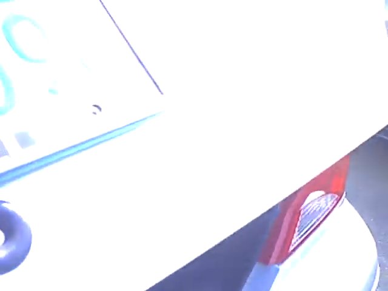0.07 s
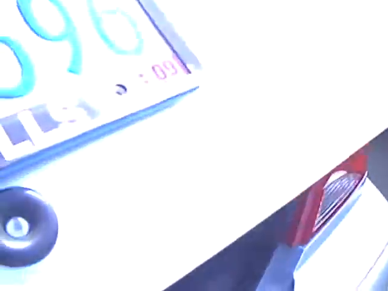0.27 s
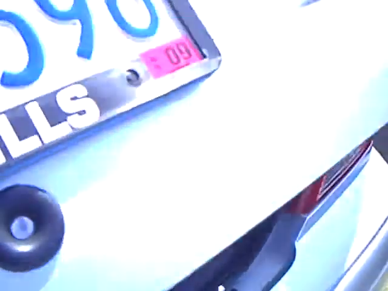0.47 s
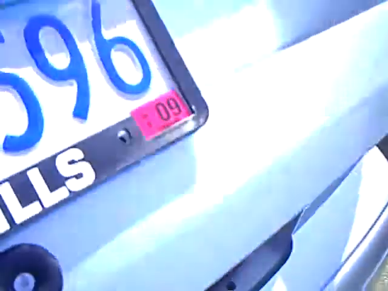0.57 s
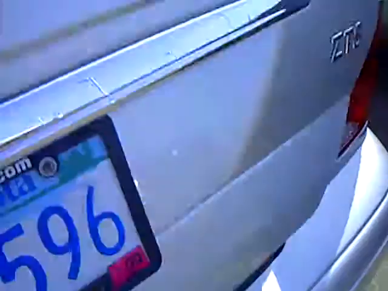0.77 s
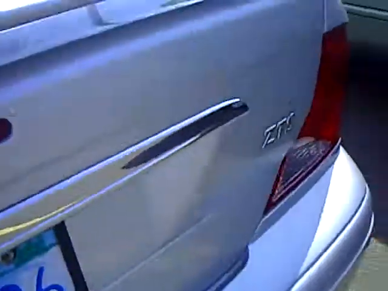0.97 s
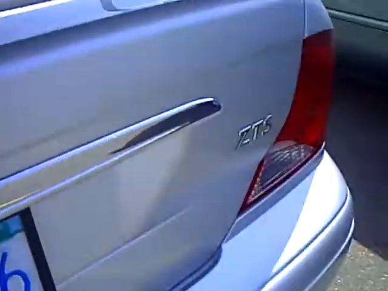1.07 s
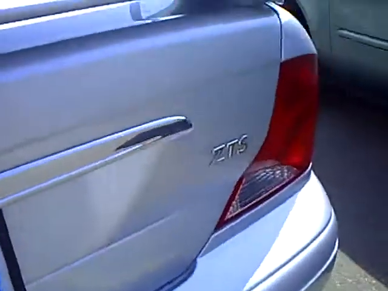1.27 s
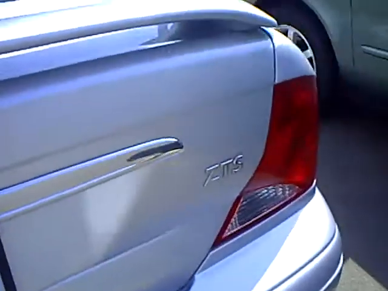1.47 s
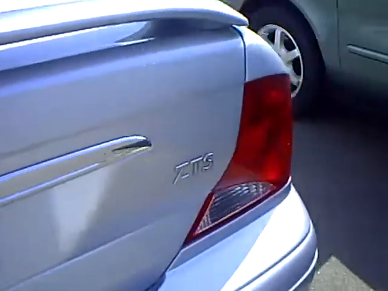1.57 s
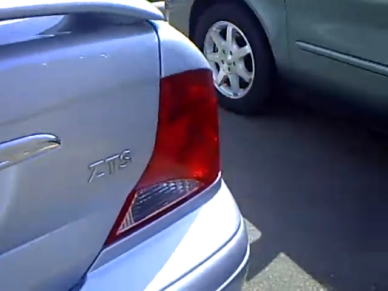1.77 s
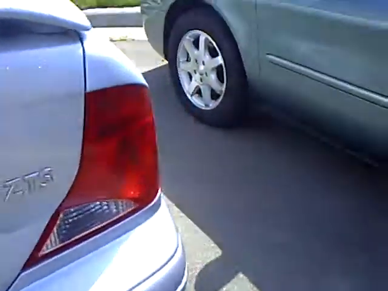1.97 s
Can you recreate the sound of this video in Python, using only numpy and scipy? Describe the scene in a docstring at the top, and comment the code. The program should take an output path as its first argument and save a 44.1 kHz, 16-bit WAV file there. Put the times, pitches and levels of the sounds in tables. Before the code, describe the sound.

A car trunk slams shut in one loud, overloaded thud with low boom and short metal ring, after faint hinge creaks; small handling clicks follow over quiet outdoor rumble, heard close on a cheap microphone.

```python
"""A car's trunk lid is heard rubbing on its hinges, then slamming with a boom, a metallic ring and a rattle.
The slam is enveloped noise over a slower wash; struck modes give the lid, trapped air, body and fittings.
Filtered friction noise gives hinges and rustles; short rings and snaps give small handling clicks.
A thin hiss follows. Behind all lie flickering outdoor noise, an idling engine and a distant whine.
The microphone overloads on the slam."""
import sys
import numpy as np
from scipy import signal
from scipy.io import wavfile

SR = 44100
rng = np.random.default_rng(int(sys.argv[2]) if len(sys.argv) > 2 else 0)


def transcribe(signal):
    """Save signal, clipped to [-1, 1], as a 16-bit WAV file at the path in sys.argv[1]."""
    frames = np.atleast_2d(signal).T
    limited = np.clip(frames, -1, 1)
    pcm = np.round(limited * 32767).astype(np.int16)
    wavfile.write(sys.argv[1], SR, pcm)


N = 89346
TIME_S = np.arange(N) / SR

# Lid meets seal, latch and stops, then its fittings bounce.
# Each row: time in seconds, level in dB, brightness in dB per octave.
BLOWS = [(0.878, -10.5, -3), (0.8829, -2, -6.5), (.8925, 4.5, -0.5), (0.9038, 3.5, -8), (0.9131, -6, -1),
         (.921, -4.5, 0.5), (.933, -12, 0.5), (.951, -15, 4), (.9555, 0.5, 3), (0.994, -15, 0),
         (0.9964, -7.5, 1.5), (1.0069, -15, -3), (1.016, -23.5, -2.5), (1.033, -15, -0.5),
         (1.036, -11.5, 1.5), (1.046, -18.5, 0), (1.0701, -24, -1.5), (1.085, -34, 1), (1.1234, -33, 2),
         (1.149, -38, -1.5), (1.164, -40.5, -2), (1.1698, -29.5, -1.5), (1.184, -33, -1.5),
         (1.195, -41.5, 2.5), (1.229, -47.5, 0.5), (1.2561, -46, 2), (1.293, -41, -6.5), (1.365, -48, -3)]
# Colour of a contact. Each row: frequency in Hz, relative density in dB per Hz.
CONTACT_COLOUR = [(100, 3), (250, -4.5), (480, -2.5), (680, 1.5), (1000, 3.5), (1500, 1), (2150, -1.5),
                  (3000, -10.5), (5000, -16.5), (6200, -14.5), (7000, -28.5), (10500, -34), (12500, -56),
                  (16000, -59)]
# Latch steel, sounded by every blow. Each row: frequency in Hz, first-pass width in Hz, relative level in dB.
LATCH = [(2104, 170, -8), (6140, 120, -20)]
CONTACT_ATTACK_S, CONTACT_T60_S = 0.001, 0.046
GRAIN_DB, GRAIN_RATE_HZ = 2.5, 250

# Wash of ringing panels. Each row: frequency in Hz, relative density in dB per Hz.
WASH_COLOUR = [(60, -1), (130, 4.5), (220, 1), (340, 3), (500, -11), (700, -11.5), (1100, -5), (2100, -17),
               (3200, -23.5), (6200, -38), (10000, -49), (16000, -74)]
# Decay of the wash. Each row: frequency in Hz, T60 in seconds.
WASH_T60 = [(100, 0.38), (350, 0.42), (1000, 0.38), (2500, 0.25), (9000, .2)]
WASH_DB, WASH_SWELL_S = -13.5, 0.0041
WASH_GRAIN_DB, WASH_GRAIN_RATE_HZ = 1, 70.4

# Sheet metal of the lid. Each row: frequency in Hz, relative level in dB, T60 in seconds.
LID_MODES = [(150.1, -19, 0.56), (189.6, -18.5, .36), (239.1, -22.5, 0.52), (297, -23, 0.27),
             (344.3, -30.5, 0.24), (389.4, -32, 0.51), (462.2, -24, .22), (537, -23.5, 0.15),
             (735, -23.5, 0.26), (869, -23, 0.24), (937, -18.5, 0.16), (990.5, -26, .24),
             (1130, -26.5, 0.4), (1428, -32, .2), (2130, -26.5, .22)]
LID_STRENGTH_SPREAD_DB = 2.2

# Soft pushes on the trapped air. Each row: start in seconds, length in seconds, level in dB.
PUSHES = [(0.9, 0.0097, -1.5), (0.916, .010, -8)]
# Trapped air, and the body on its springs. Each row: frequency in Hz, relative level in dB, T60 in seconds.
CAVITY_MODES = [(25, -4, .45), (46.1, 8, 0.14), (58.9, -2, 0.42)]
# The body takes the lid's weight in dull knocks. Each row: start in seconds, level in dB.
KNOCKS = [(.8915, -0.5), (0.9344, 4.5)]
# Big body panels. Each row: frequency in Hz, relative level in dB, T60 in seconds.
BODY_MODES = [(105, -21, .3), (131, -11.5, 0.28), (186.7, -10, .2), (211, -9, .11), (243, -13, .19)]
KNOCK_S = 0.0018

# Ring of loose fittings. Each row: frequency in Hz, relative level in dB, T60 in seconds.
FITTINGS = [(880, -3, .05), (1128, 2, 0.036), (1400, -3, 0.059), (1750, -4, .03), (2300, -2.5, 0.012),
            (3800, -6, .015), (5640, -10, .012), (7600, -20.5, 0.012)]
CHATTER_AT_S, CHATTER_T60_S, CHATTER_PER_S, CHATTER_DB = 0.95, 0.6, 140, -26.5

# Hinge rubs. Each row: start in seconds, length in seconds, relative level in dB, brightness in dB per octave.
RUBS = [(.258, 0.089, -43.5, -2), (.424, 0.049, -44, -6.5), (.70, 0.094, -52, 1.5), (.748, 0.079, -45, -2)]
# Colour of a rub. Each row: frequency in Hz, relative density in dB per Hz.
RUB_COLOUR = [(80, -10), (170, 2.5), (260, -7), (380, -5.5), (550, -4.5), (850, 2.5), (1550, 2),
              (2100, -19), (3600, -14), (4800, -25.5), (7500, -31.5), (12000, -49.5)]
# Hinge and lid resonances. Each row: frequency in Hz, first-pass width in Hz, relative level in dB.
RUB_RESONANCES = [(398.7, 30, -3), (800.4, 41, -0.5), (1195, 70, -8), (1627, 25, -8.5)]
RUBS_TRIM_DB, RUB_RING_TRIM_DB = -3.5, -1.5
STROKE_ATTACK_S, STROKE_T60_S = 0.011, 0.15

# Handling clicks. Each row: time in seconds, level in dB, pitch in Hz, casing in dB relative to the click.
CLICKS = [(0.2618, -45.5, 3800, -1), (0.495, -42, 2200, 6), (0.503, -46, 3000, 0), (.517, -35.5, 2780, -2),
          (0.5208, -36.5, 3120, -0.5), (.531, -40.5, 6540, 3), (.547, -42, 2300, -1),
          (.5675, -42.5, 2100, 2), (1.585, -41, 2300, 3), (1.592, -36, 2300, 5), (1.607, -19.5, 1730, 0.5),
          (1.6099, -32, 1497, 4), (1.6145, -44.5, 6200, -1), (1.92, -41, 1700, -1), (1.931, -40, 3310, -3),
          (1.9595, -41, 1800, 0), (1.9735, -33, 2440, -4), (1.977, -28.5, 2460, -7),
          (1.9871, -28.5, 3400, -4), (2.004, -33, 1220, -4), (2.019, -36, 1670, -3)]
# Colour of the snap. Each row: frequency in Hz, relative density in dB per Hz.
CLICK_COLOUR = [(300, 12), (1500, 18), (4000, -2), (7000, 2.5), (10500, -23), (13000, -47)]
# Small plastic casing. Each row: frequency in Hz, relative level in dB, T60 in seconds.
CASING = [(666, -13, 0.0088), (2300, -12, 0.012), (3890, -7.5, 0.0016), (5880, -9, 0.0073),
          (8260, -13.5, 0.0054), (10400, -18.5, 0.0027)]
CLICK_ATTACK_S, CLICK_T60_S, CLICK_SNAP_DB = 0.00085, 0.007, -25

# Soft rustles of the hand.
# Each row: start in seconds, length in seconds, relative level in dB, brightness in dB per octave.
RUSTLES = [(.49, 0.056, -51, -5.5), (1.55, 0.076, -63.5, 0.5), (1.572, 0.014, -54, -1.5),
           (1.67, 0.24, -71, 2), (1.915, .11, -53, -2)]
# Colour of a rustle. Each row: frequency in Hz, relative density in dB per Hz.
RUSTLE_COLOUR = [(800, -8), (2200, 0.5), (4200, -3.5), (6300, -1.5), (10000, -16.5), (13000, -46)]
RUSTLE_GRAIN_DB, RUSTLE_GRAIN_RATE_HZ = 2.8, 180

HISS_AT_S, HISS_S, HISS_HZ, HISS_PASS_WIDTH_HZ, HISS_DB = 1.2, 0.24, 3370, 640, -63.5

# Outdoor background. Each row: frequency in Hz, relative density in dB per Hz.
AIR_COLOUR = [(20, -1.5), (45, 1), (100, -5.5), (150, -10.5), (230, -15), (370, -24.5), (850, -28),
              (1300, -32.5), (2200, -43), (4000, -51.5), (6500, -54.5), (10000, -57.5), (12000, -73.5),
              (16000, -84)]
# Background flicker. Each row: frequency in Hz, spread in dB.
AIR_FLICKER = [(60, 2.5), (400, 2.5), (2000, 1.5), (8000, 2)]
# Background bass gain. Each row: time in seconds, gain in dB.
BASS_GAIN = [(0, 4), (.2, -3.5), (.45, 0.5), (.8, -0.5), (1.4, 1.5), (1.65, 0), (1.8, -3.5), (2.03, -3)]
# Idling engine and distant whine.
# Each row: frequency in Hz, relative level in dB, full from and full until in seconds.
HUMS = [(78.2, -42.5, 0, 2.1), (458, -60.5, 1.3, 2.1), (934, -63.5, 1.65, 2)]
AIR_DB, AIR_FLICKER_RATE_HZ, BASS_BELOW_HZ = -38.5, 12, 350
HUM_WAVER_HZ, HUM_WAVER_RATE_HZ, HUM_FADE_S = 5.7, 8, 0.066

BASS_BOTTOM_HZ, TREBLE_TOP_HZ = 8, 10900
OVERLOAD_LEVEL, KNEE_SHARPNESS = 0.69, 9.6
DULL_HZ, STOPBAND_HZ = 11000, 16500


def from_db(db):
    """Decibels to amplitude gain."""
    return 10 ** (np.asarray(db) / 20)


def rms_one(x):
    """Scale to unit power."""
    return x / np.sqrt(np.mean(x ** 2) + 1e-20)


def at_hz(points, hz):
    """Read a table on a log-frequency axis."""
    table_hz, values = np.transpose(points)
    return np.interp(np.log(hz), np.log(table_hz), values)


def drift(rate_hz):
    """Low-passed random wander of unit RMS."""
    pole = np.exp(-2 * np.pi * rate_hz / SR)
    wander = signal.lfilter([1], [1, -2 * pole, pole * pole], rng.standard_normal(2 * N))
    return rms_one(wander[N:])  # first half settles the filter


def decay(elapsed_s, t60_s):
    """Exponential decay, 60 dB per T60, held at 1 before its start."""
    return np.exp(-np.log(1000) * np.clip(elapsed_s / t60_s, 0, 10))


def dying(start_s, t60_s, attack_s):
    """Linear attack under an exponential decay."""
    elapsed_s = TIME_S - start_s
    return np.clip(elapsed_s / attack_s, 0, 1) * decay(elapsed_s, t60_s)


def stroke(start_s, length_s):
    """Rubbing envelope: attack, hold, exponential release."""
    attack = np.clip((TIME_S - start_s) / STROKE_ATTACK_S, 0, 1)
    return attack * decay(TIME_S - start_s - length_s, STROKE_T60_S)


def push(start_s, length_s):
    """Smooth shove of unit area."""
    shape = np.sin(np.pi * np.clip((TIME_S - start_s) / length_s, 0, 1)) ** 2
    return shape / shape.sum()


def ring(x, hz, t60_s):
    """Damped mode: a unit impulse starts a decaying unit sine."""
    pole = np.exp(-np.log(1000) / (t60_s * SR))
    angle = 2 * np.pi * hz / SR
    return signal.lfilter([0, np.sin(angle)], [1, -2 * pole * np.cos(angle), pole * pole], x + 1e-18)


def resonate(x, hz, width_hz):
    """Two-pole resonance with about unit peak gain."""
    pole = np.exp(-np.pi * width_hz / SR)
    feedforward = np.array([1, 0, -1]) * (1 - pole * pole) / 2
    feedback = [1, -2 * pole * np.cos(2 * np.pi * hz / SR), pole * pole]
    return signal.lfilter(feedforward, feedback, x + 1e-18)


def resonant_noise(hz, first_width_hz, second_width_hz):
    """White noise through two resonances in series, at unit power."""
    once = resonate(rng.standard_normal(N), hz, first_width_hz)
    return rms_one(resonate(once, hz, second_width_hz))


def bands(colour):
    """Third-octave noise as (Hz, noise), band powers summing to one."""
    edges_hz = 18 * 2 ** (np.arange(30) / 3)
    centres_hz = np.sqrt(edges_hz[1:] * edges_hz[:-1])
    white = rng.standard_normal((2, N))
    gains = from_db(at_hz(colour, centres_hz)) * np.sqrt(centres_hz)  # density to band level
    gains /= np.linalg.norm(gains)
    parts = []
    for k, hz in enumerate(centres_hz):
        band = signal.butter(3, edges_hz[k:k + 2], "band", fs=SR, output="sos")
        # neighbouring bands use different noise
        parts.append((hz, gains[k] * rms_one(signal.sosfilt(band, white[k % 2]))))
    return parts


def tilt(db_per_octave, hz):
    """Spectral slope pivoting at 1 kHz, flat below 400 Hz."""
    return from_db(db_per_octave * np.log2(max(hz, 400) / 1000))


def slam():
    """Blows make gritty contact noise and feed the slower panel wash."""
    times_s, levels_db, brightness = np.transpose(BLOWS)
    crack_power = np.array([dying(t, CONTACT_T60_S, CONTACT_ATTACK_S) ** 2 for t in times_s])
    grit = rms_one(from_db(GRAIN_DB * drift(GRAIN_RATE_HZ)))
    parts = []
    for hz, width_hz, level_db in LATCH:
        parts.append((hz, from_db(level_db) * resonant_noise(hz, width_hz, 2 * width_hz)))
    cracks = np.zeros(N)
    for hz, noise in parts + bands(CONTACT_COLOUR):
        blow_power = (from_db(levels_db) * tilt(brightness, hz)) ** 2
        cracks += noise * np.sqrt(blow_power @ crack_power)
    return cracks * grit + panel_wash(times_s, levels_db)


def panel_wash(times_s, levels_db):
    """Blow energy swells into dense panel noise with frequency-dependent decay."""
    energy = np.zeros(N)
    energy[(times_s * SR).astype(int)] = from_db(levels_db) ** 2
    swell = np.exp(-1 / (WASH_SWELL_S * SR))
    energy = signal.lfilter([1 - swell], [1, -swell], energy + 1e-18)
    shaking = rms_one(from_db(WASH_GRAIN_DB * drift(WASH_GRAIN_RATE_HZ)))
    out = np.zeros(N)
    for hz, noise in bands(WASH_COLOUR):
        keep = np.exp(-2 * np.log(1000) / (at_hz(WASH_T60, hz) * SR))  # energy kept per sample
        out += noise * np.sqrt(signal.lfilter([1], [1, -keep], energy))
    return from_db(WASH_DB) * shaking * out


def lid_ring():
    """Every blow strikes each sheet-metal mode with its own random strength."""
    times_s, levels_db, _ = np.transpose(BLOWS)
    spread_db = rng.normal(0, LID_STRENGTH_SPREAD_DB, (len(times_s), len(LID_MODES)))
    strengths = from_db(levels_db[:, None] + spread_db)
    out = np.zeros(N)
    for k, (hz, mode_db, t60_s) in enumerate(LID_MODES):
        hits = np.zeros(N)
        hits[(times_s * SR).astype(int)] = strengths[:, k]
        out += (-1) ** k * from_db(mode_db) * ring(hits, hz, t60_s)
    return out


def alternating_modes(drive, modes):
    """One drive rings a bank of modes of alternating polarity."""
    return sum((-1) ** k * from_db(db) * ring(drive, hz, t60_s) for k, (hz, db, t60_s) in enumerate(modes))


def boom():
    """The closing lid pushes on trapped air and knocks on body panels, exciting their modes."""
    pushes = sum(from_db(db) * push(start_s, length_s) for start_s, length_s, db in PUSHES)
    knocks = sum(from_db(db) * push(start_s, KNOCK_S) for start_s, db in KNOCKS)
    air = sum(from_db(db) * ring(pushes, hz, t60_s) for hz, db, t60_s in CAVITY_MODES)
    return air + alternating_modes(knocks, BODY_MODES)


def chatter():
    """Random touches ring loose fittings under one dying envelope."""
    touches = (rng.random(N) < CHATTER_PER_S / SR) * from_db(rng.normal(0, 2, N))
    rings = np.zeros(N)
    for hz, db, t60_s in FITTINGS:
        rings += from_db(db) * ring(touches * rng.standard_normal(N), hz, t60_s)
    envelope = dying(CHATTER_AT_S, CHATTER_T60_S, CONTACT_ATTACK_S)
    return from_db(CHATTER_DB) * envelope * rms_one(rings)


def rubbed(strokes, parts):
    """Friction: (Hz, noise) parts shaped by stroke level and brightness."""
    _, _, levels_db, brightness = np.transpose(strokes)
    shapes = np.array([stroke(start_s, length_s) for start_s, length_s, _, _ in strokes])
    return sum(noise * ((from_db(levels_db) * tilt(brightness, hz)) @ shapes) for hz, noise in parts)


def hinges():
    """Broad friction noise plus noise resonating in hinge and lid."""
    rings = []
    for hz, width_hz, db in RUB_RESONANCES:
        noise = resonant_noise(hz, width_hz, 2 * width_hz)
        rings.append((hz, from_db(db + RUB_RING_TRIM_DB) * noise))
    return from_db(RUBS_TRIM_DB) * rubbed(RUBS, bands(RUB_COLOUR) + rings)


def clicks():
    """Each impulse rings its own pitch and the casing, with a broadband snap."""
    snap = sum(noise for _, noise in bands(CLICK_COLOUR))
    out, casing_taps = np.zeros(N), np.zeros(N)
    for time_s, db, hz, casing_db in CLICKS:
        tap = from_db(db) * (np.arange(N) == int(time_s * SR))
        casing_taps += from_db(casing_db) * tap
        out += ring(tap, hz, CLICK_T60_S)
        out += from_db(db + CLICK_SNAP_DB) * dying(time_s, CLICK_T60_S, CLICK_ATTACK_S) * snap
    return out - alternating_modes(casing_taps, CASING)


def rustles():
    """Hand friction: coloured noise strokes with uneven grain."""
    friction = rubbed(RUSTLES, bands(RUSTLE_COLOUR))
    return friction * rms_one(from_db(RUSTLE_GRAIN_DB * drift(RUSTLE_GRAIN_RATE_HZ)))


def hiss():
    """Narrow-band noise gives a thin hiss after the slam."""
    noise = resonant_noise(HISS_HZ, HISS_PASS_WIDTH_HZ, HISS_PASS_WIDTH_HZ)
    return from_db(HISS_DB) * stroke(HISS_AT_S, HISS_S) * noise


def background():
    """Flickering noise bands and frequency-wavering sines; bass follows its own gain curve."""
    bass = from_db(np.interp(TIME_S, *np.transpose(BASS_GAIN)))
    parts = []
    for hz, noise in bands(AIR_COLOUR):
        flicker_db = at_hz(AIR_FLICKER, hz) * drift(AIR_FLICKER_RATE_HZ)
        parts.append((hz, from_db(AIR_DB + flicker_db) * noise))
    for hz, db, start_s, end_s in HUMS:
        gate = np.clip(1 + np.minimum(TIME_S - start_s, end_s - TIME_S) / HUM_FADE_S, 0, 1)
        wavering_hz = hz + HUM_WAVER_HZ * drift(HUM_WAVER_RATE_HZ)
        tone = np.sqrt(2) * np.sin(2 * np.pi * np.cumsum(wavering_hz) / SR)  # unit RMS
        parts.append((hz, from_db(db) * gate * tone))
    return sum(part * (bass if hz < BASS_BELOW_HZ else 1) for hz, part in parts)


def scene():
    """Sum all sources into one channel."""
    closing = slam() + lid_ring() + boom() + chatter() + hinges()
    return (closing + clicks() + rustles() + hiss() + background())[None]


def record(dry):
    """Band limits (little below 8 Hz or above 10.9 kHz), overload with a knee, then dulled and cut treble."""
    treble_limit = signal.cheby1(8, 0.5, TREBLE_TOP_HZ, fs=SR, output="sos")
    bass_limit = signal.butter(1, BASS_BOTTOM_HZ, "high", fs=SR, output="sos")
    heard = signal.sosfilt(bass_limit, signal.sosfilt(treble_limit, dry))
    overdrive = np.abs(heard / OVERLOAD_LEVEL) ** KNEE_SHARPNESS
    clipped = heard / (1 + overdrive) ** (1 / KNEE_SHARPNESS)
    dulling = signal.butter(3, DULL_HZ, fs=SR, output="sos")
    cutoff = signal.cheby2(12, 70, STOPBAND_HZ, fs=SR, output="sos")  # 70 dB stopband
    return signal.sosfilt(cutoff, signal.sosfilt(dulling, clipped))


dry = scene()
out = record(dry)
transcribe(out)
```